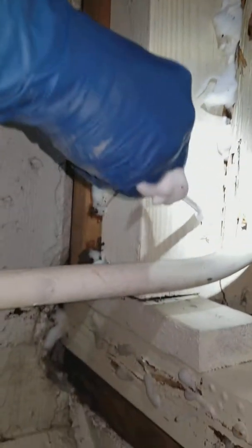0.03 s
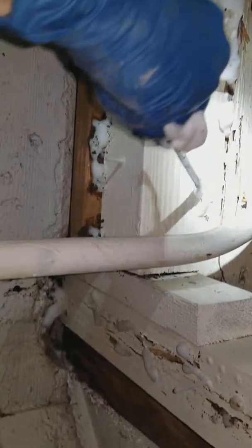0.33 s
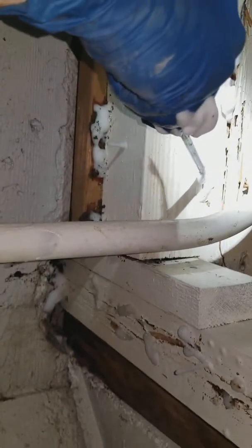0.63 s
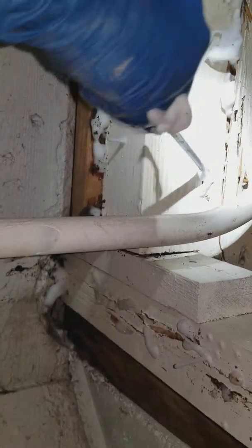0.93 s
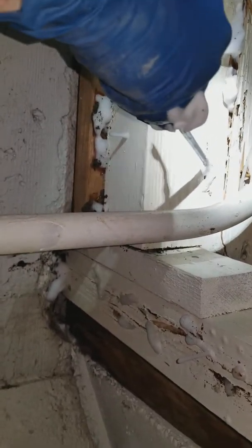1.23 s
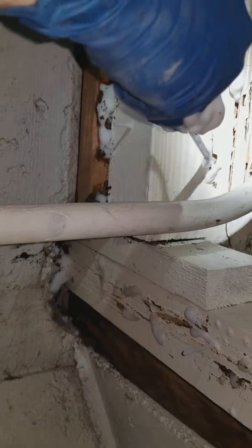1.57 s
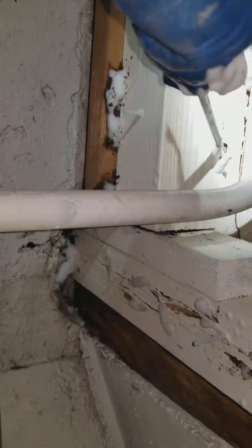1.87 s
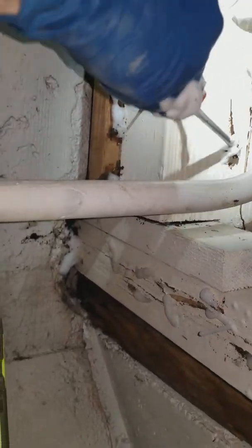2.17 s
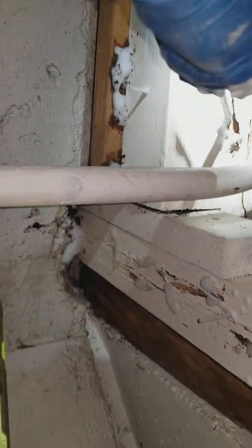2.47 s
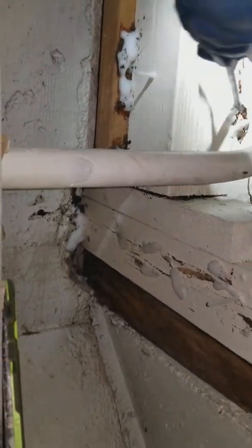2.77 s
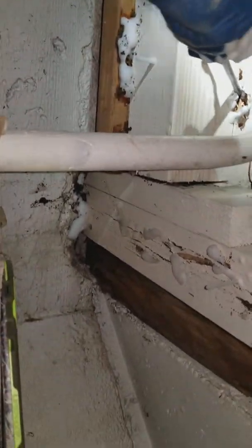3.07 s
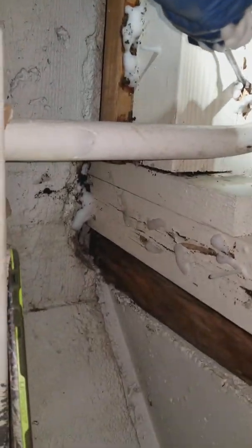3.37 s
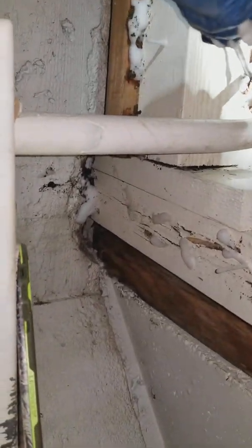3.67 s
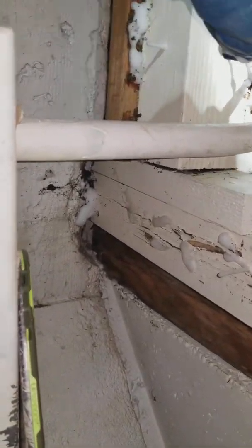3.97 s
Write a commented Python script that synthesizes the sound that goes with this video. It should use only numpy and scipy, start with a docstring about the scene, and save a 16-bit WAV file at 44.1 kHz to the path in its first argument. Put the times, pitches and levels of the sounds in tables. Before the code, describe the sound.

Close by in a tight crawlspace, a wooden beam cracks under a metal pry tool. The blade scrapes softly, then two sharp, splintering crunches with a low boom break out, followed by scraping and ticking chips.

```python
"""A steel pry tool levers a rotten wooden beam open twice in a cramped crawlspace.
Each pry is a swelling crunch of tearing fibres with sharp splinter cracks; the beam booms,
then loose chips tick down. Around the pries the blade scrapes, squeaks and knocks, and an arm
bumps the timber; a few dry clacks sound in between.
The close walls answer briefly over a faint low rumble."""
import sys
import numpy as np
from scipy import signal
from scipy.fft import rfft, irfft, next_fast_len
from scipy.io import wavfile

SR = 44100
rng = np.random.default_rng(int(sys.argv[2]) if len(sys.argv) > 2 else 0)


def file_out(sig):
    """Save sig as 16-bit WAV at sys.argv[1]."""
    # one column per channel
    cols = np.atleast_2d(sig).T
    # limit, then scale
    lim = np.clip(cols, -1, 1)
    pcm = np.round(lim * 32767).astype(np.int16)
    wavfile.write(sys.argv[1], SR, pcm)


N = 176400

# timber resonances: f/Hz, level/dB
WOOD_SPECTRUM = [(40, -21), (110, -2), (165, -1), (215, -9), (270, 3), (360, 1), (430, -4), (510, -5.5),
                 (660, -3), (880, 0), (1200, -2), (1480, 4.5), (1920, 2.5), (2400, -13.5), (3000, -1.5),
                 (3650, -4), (4600, -10), (6000, -11.5), (7800, -21.5), (9300, -41), (11500, -36),
                 (16000, -33.5)]
# boom of the loaded beam: f/Hz, level/dB
BOOM_SPECTRUM = [(40, -27.5), (110, 2), (250, 1), (400, -0.5), (750, -3.5), (1300, -38), (16000, -100)]
# hollow ring of the beam: f/Hz, level/dB, t60/s
BEAM_MODES = [(169, -7, 0.15), (276, -0.5, 0.2), (349.8, -3, 0.29), (421, -2, 0.12), (522, -7.5, .09),
              (820, -8.5, .08)]


def amp(db):
    """Decibels to gain."""
    return 10 ** (np.asarray(db) / 20)


def unit(x):
    """Scale to rms 1."""
    return x / np.sqrt(np.mean(x ** 2) + 1e-30)


def along(points, hz):
    """Interpolate (f/Hz, value) points on a log axis."""
    f, v = np.transpose(points)
    return np.interp(np.log(hz + 1), np.log(f + 1), v)


def filtered(x, response):
    """Apply a complex frequency response."""
    n = x.shape[-1]
    m = next_fast_len(n + 8192)
    return irfft(rfft(x, m) * response(np.fft.rfftfreq(m, 1 / SR)), m)[..., :n]


def kernel(*spectra, size=2048):
    """Minimum-phase impulse response of spectra in series."""
    hz = np.fft.rfftfreq(size, 1 / SR)
    cepstrum = irfft(np.log(amp(sum(along(points, hz) for points in spectra))))
    cepstrum[1:size // 2] *= 2
    cepstrum[size // 2 + 1:] = 0
    return irfft(np.exp(rfft(cepstrum)))


def colour(x, response):
    """Convolve, then scale to rms 1."""
    return unit(signal.fftconvolve(x, response)[:len(x)])


def add(track, start_s, x):
    """Mix x in from start_s."""
    i = max(0, round(start_s * SR))
    n = max(0, min(x.shape[-1], N - i))
    track[..., i:i + n] += x[..., :n]


def mode(t, hz, t60_s):
    """Decaying sine."""
    return 1000 ** (-t / t60_s) * np.sin(2 * np.pi * hz * t)


def grains(n, per_s, spread_db=3.5):
    """Tiny fractures at random times, a few much stronger."""
    size = amp(spread_db * np.minimum(rng.exponential(size=n), 4))
    return size * rng.choice([-1, 1], n) * (rng.random(n) < per_s / SR)


def stroke(length_s, rise_s=0.0073, fall_tau_s=0.015):
    """Force envelope: rise, hold, fade."""
    t = np.arange(SR // 3) / SR
    return np.minimum(t / rise_s, 1) * np.exp(-np.maximum(t - length_s, 0) / fall_tau_s)


def diffuse(n):
    """Stereo noise, alike in the bass, unrelated near 1.2 kHz, closer again above."""
    # f/Hz, left-right correlation
    correlation = [(50, 1), (250, 0.75), (600, .5), (1200, 0), (16000, 0.9)]

    def mid_side_gains(hz):
        angle = np.arccos(np.clip(along(correlation, hz), -1, 1)) / 2
        return np.array([np.cos(angle), np.sin(angle)])

    mid, side = filtered(rng.standard_normal((2, n)), mid_side_gains)
    return np.array([mid + side, mid - side])


def rumble(rms_db=-61):
    """Faint low noise of the still air."""
    # f/Hz, level/dB
    spectrum = [(12, -37.5), (20, -9.5), (96, 0.5), (240, -21), (499, -30), (678, -35), (1760, -32.5),
                (1910, -32.5), (2600, -38), (16000, -42.5)]
    return amp(rms_db) * unit(filtered(diffuse(N), lambda hz: amp(along(spectrum, hz))))


def crawlspace(wall_db=0.5, wall_t60_s=0.023):
    """One stereo path: direct sound, reflections off the nearest timber, short tail."""
    # tail decay: f/Hz, t60/s
    decay = [(100, 0.15), (300, 0.34), (800, 0.35), (1400, 0.29), (1950, 0.38), (2600, 0.33), (5000, 0.21),
             (13000, 0.24)]
    # tail spectrum: f/Hz, level/dB
    spectrum = [(100, -3.5), (400, -4), (1500, -5.5), (4000, -8.5), (8000, -5.5), (14000, -8)]
    # direct sound, left ahead of right: f/Hz, lead/s
    lead = [(300, 0.000032), (1400, 0.00018), (2400, 0.00046), (16000, .00047)]
    n = int(0.4 * SR)
    t = np.arange(n) / SR
    hz, frame_s, noise = signal.stft(diffuse(n), SR, nperseg=256)
    t60_s = along(decay, hz)[:, None]
    energy_norm = np.sqrt(2 * np.log(1000) / (t60_s * SR))
    gain = amp(along(spectrum, hz)[:, None] - 60 * frame_s / t60_s) * energy_norm
    tail = signal.istft(noise * gain, SR, nperseg=256)[1][:, :n] * (1 - np.exp(-t / 0.0011))
    walls = diffuse(n) * amp(-60 * t / wall_t60_s) * (1 - np.exp(-t / 0.001))
    right_only = np.array([[0], [1]])
    direct = filtered(1. * (t == 0), lambda f: np.exp(-2j * np.pi * f * along(lead, f) * right_only))
    return direct + tail + amp(wall_db) * unit(walls) / np.sqrt(n)


def heard(x, paths):
    """Send x down a random path: each sound starts at a slightly different spot."""
    return signal.fftconvolve(x[None], paths[rng.integers(len(paths))], axes=1)


def bumping():
    """An arm thuds softly against the timber; mono."""
    # t/s, length/s, level/dB
    bumps = [(0, 0.11, -44.5), (0.453, 0.062, -41), (0.515, 0.094, -46), (1.26, 0.029, -50),
             (2.019, 0.064, -31.5), (2.259, 0.1, -42.5), (3.069, 0.05, -45)]
    # f/Hz, level/dB
    spectrum = [(25, -44), (58, -16), (75, 6.5), (92, -6), (114, 8.5), (135, -15.5), (165, -3.5),
                (230, -18), (500, -44), (2000, -71.5)]
    out = np.zeros(N)
    for start_s, length_s, db in bumps:
        force = stroke(length_s)
        thud = filtered(rng.standard_normal(len(force)), lambda hz: amp(along(spectrum, hz)))
        add(out, start_s, amp(db) * force * unit(thud))
    return out


def clacking(paths, t60_s=0.06):
    """Three short, dry midrange clacks."""
    # t/s, level/dB
    clacks = [(1.061, -39.5), (1.832, -41.5), (2.233, -39.5)]
    # f/Hz, level/dB
    spectrum = [(300, -49), (900, -13), (1250, 4), (1800, 6), (2400, -9.5), (3000, -7.5), (4200, -25),
                (6000, -38), (16000, -54.5)]
    out, t = np.zeros((2, N)), np.arange(SR // 8) / SR
    for start_s, db in clacks:
        rattle = colour(rng.standard_normal(len(t)), kernel(spectrum))
        add(out, start_s, heard(amp(db) * 1000 ** (-t / t60_s) * rattle, paths))
    return out


def knocking(falloff_db_per_octave=19.5, damping_t60_s=0.12):
    """Blunt knocks ring the beam's modes near one pitch; the resting tool damps them."""
    # t/s, centre f/Hz, level/dB
    knocks = [(1.508, 170, -46), (2.354, 166, -37), (2.403, 174.4, -27), (3.492, 209, -29.5),
              (3.513, 208, -28.5), (3.672, 276, -37)]
    out, t = np.zeros(N), np.arange(SR // 5) / SR
    envelope = 1000 ** (-t / damping_t60_s) * (1 - np.exp(-t / 0.00071))
    for start_s, centre_hz, knock_db in knocks:
        ring = sum(amp(db - falloff_db_per_octave * abs(np.log2(hz / centre_hz))) * mode(t, hz, t60_s)
                   for hz, db, t60_s in BEAM_MODES)
        add(out, start_s, amp(knock_db) * ring / np.abs(ring).max() * envelope)
    return out


def scraping(paths, slips_per_s=6000):
    """The blade rasps over the grain and shakes the beam."""
    # t/s, length/s, rasp/dB, boom/dB
    scrapes = [(0, 0.063, -46.5, -53), (0.103, 0.058, -63.5, -76), (0.318, 0.096, -60, -71),
               (0.353, 0.034, -52.5, -88), (0.433, 0.039, -53.5, -63.5), (0.549, 0.045, -56.5, -60),
               (0.796, 0.065, -52.5, -54.5), (.94, 0.17, -62, -65.5), (1.48, 0.022, -51.5, -57.5),
               (1.494, 0.031, -44, -41), (1.574, 0.068, -57.5, -59), (2.117, 0.11, -52.5, -47.5),
               (2.3, 0.044, -47.5, -53), (2.348, 0.035, -47, -40.5), (2.39, 0.023, -41.5, -35),
               (3.036, 0.13, -60, -68), (3.292, 0.05, -42, -43), (3.471, 0.042, -49.5, -44),
               (3.714, 0.23, -66, -64.5), (3.933, 0.07, -50, -67)]
    # f/Hz, level/dB
    rasp_spectrum = [(200, -19), (550, -20), (900, -1.5), (1500, -2), (2500, 1.5), (3600, 0), (5200, -1.5),
                     (7500, -0.5), (9500, 2), (16000, 5)]
    out = np.zeros((2, N))
    for start_s, length_s, rasp_db, boom_db in scrapes:
        force = stroke(length_s)
        shift = np.exp(rng.normal(0, 0.035))  # resonances vary from spot to spot
        wood = [(hz * shift, db) for hz, db in WOOD_SPECTRUM]
        slips = grains(len(force), slips_per_s)
        rasp = amp(rasp_db) * colour(slips, kernel(rasp_spectrum, wood))
        boom = amp(boom_db) * colour(slips, kernel(BOOM_SPECTRUM, wood))
        add(out, start_s, heard(force * (rasp + boom), paths))
    return out


def squeaking(paths, relative_width=0.018):
    """Steel squeaks on wood: narrow-band noise."""
    # t/s, length/s, f/Hz, level/dB
    squeaks = [(0.558, 0.037, 3420, -65.5), (1.494, 0.0078, 5150, -48), (1.573, 0.045, 3590, -61)]
    out = np.zeros((2, N))
    for start_s, length_s, pitch_hz, db in squeaks:
        force = stroke(length_s)
        noise = rng.standard_normal(len(force))
        whine = filtered(noise, lambda hz: 1 / (1 + ((hz / pitch_hz - 1) / relative_width) ** 2))
        add(out, start_s, heard(amp(db) * force * unit(whine), paths))
    return out


def hits(rows, band_decay, paths, grit, click_db, twang_db):
    """Each hit: a click, a twang at its own pitch, a splintering burst and the beam's ring."""
    # low, mid, high, top band: lower f/Hz, upper f/Hz
    band_edges = [(140, 550), (550, 2500), (2500, 8000), (8000, 16000)]
    twang_t60_s, twang_rise_s = 0.016, 0.0007
    ring_db, ring_scatter_db, ring_rise_s = -4, 2.5, 0.0046
    level_span_s = 0.018  # a burst's level is its energy spread over this span
    out, t = np.zeros((2, N)), np.arange(SR // 6) / SR
    wood = kernel(WOOD_SPECTRUM)
    bands = [signal.sosfilt(signal.butter(3, edges, 'band', fs=SR, output='sos'), wood)
             for edges in band_edges]
    for start_s, hit_db, pitch_hz, *bands_db in rows:
        hit = amp(hit_db + twang_db) * mode(t, pitch_hz, twang_t60_s) * (1 - np.exp(-t / twang_rise_s))
        for band, band_db, (trim_db, t60_s) in zip(bands, bands_db, band_decay):
            burst = (t == 0) + grit * rng.standard_normal(len(t)) * 1000 ** (-t / t60_s)
            hit += amp(band_db + trim_db) * colour(burst, band) * np.sqrt(level_span_s / t[-1])
        click = amp(hit_db + click_db) * wood / np.abs(wood).max()
        add(hit, 0, click)
        add(out, start_s, heard(hit, paths))
        ring = sum(amp(db + rng.normal(0, ring_scatter_db)) * mode(t, hz, t60_s)
                   for hz, db, t60_s in BEAM_MODES)
        add(out, start_s, amp(bands_db[0] + ring_db) * ring * (1 - np.exp(-t / ring_rise_s)))
    return out


def tapping(paths):
    """Chips land and the tool touches lightly."""
    # t/s, level/dB, f/Hz, low/dB, mid/dB, high/dB, top/dB
    taps = [(0.058, -38.5, 807, -50, -52, -64, -80), (0.133, -42, 1510, -55, -69, -66, -72),
            (0.861, -41, 3400, -55.5, -56.5, -56, -68), (0.881, -43.5, 2930, -63, -53, -53, -61),
            (0.942, -45, 1430, -61, -61, -48, -59.5), (2.3, -35, 5170, -52, -50, -46.5, -55.5),
            (3.093, -39, 1210, -61, -45.5, -51, -72), (3.159, -42.5, 1700, -65.5, -63, -53.5, -75),
            (3.491, -30.5, 890, -39.5, -47.5, -54, -62.5), (3.579, -31.5, 1220, -52, -44.5, -51, -85.5),
            (3.672, -35.5, 1950, -37.5, -44, -73.5, -87.5), (3.741, -55, 905, -47.5, -44, -43, -63),
            (3.798, -42, 3720, -59, -52, -50, -61.5), (3.833, -25, 944, -64, -32, -41.5, -60.5),
            (3.881, -44, 8100, -63, -48.5, -44, -51.5), (3.944, -36, 2070, -40.5, -23.5, -26, -39),
            (3.99, -15.5, 1970, -64, -37, -39.5, -66)]
    # per band: trim/dB, t60/s
    band_decay = [(-2.5, 0.14), (-1, 0.025), (-4.5, 0.017), (-2, 0.027)]
    return hits(taps, band_decay, paths, grit=0.075, click_db=-12, twang_db=3.5)


def cracking(paths):
    """Splinters snap under the lever."""
    # t/s, level/dB, f/Hz, low/dB, mid/dB, high/dB, top/dB
    cracks = [(1.905, -36, 3470, -60.5, -47, -42.5, -43.5), (1.919, -19.5, 1820, -50, -37.5, -34.5, -43.5),
              (1.968, -32.5, 8600, -58.5, -54.5, -41, -36.5), (1.9735, -31, 3820, -43.5, -36, -30, -34.5),
              (1.99, -12, 3590, -24.5, -23, -24, -29), (2.0245, -15, 3400, -22, -24, -20.5, -24),
              (2.0395, 4.5, 1510, -15.5, -21.5, -18, -29), (2.0595, -2.5, 3760, -19.5, -20, -19, -41),
              (2.7298, -19, 1806, -32.5, -25.5, -26, -29), (2.7435, -19.5, 3700, -35, -49, -33, -47),
              (2.75, -9.5, 3830, -24.5, -25, -22.5, -46), (2.767, -8, 1530, -30.5, -18.5, -37, -35),
              (2.7735, 1, 1810, -23.5, -24, -37, -46), (2.788, -17, 1520, -27, -20.5, -31, -40),
              (2.8, -17, 1480, -30, -19, -38, -44), (2.8235, -9.5, 1730, -41, -25, -29, -36.5),
              (2.848, -17.5, 1530, -39, -25.5, -50.5, -49.5), (2.8755, -31, 1400, -50, -33.5, -36, -41.5),
              (2.937, -38, 1940, -67, -45, -42.5, -53.5), (3.03, -24, 3380, -51, -45, -38, -50.5),
              (3.286, -16.5, 1745, -49, -33, -34.5, -38)]
    # per band: trim/dB, t60/s
    band_decay = [(-11, 0.13), (-1.5, 0.035), (-4, 0.0025), (-5, 0.0041)]
    return hits(cracks, band_decay, paths, grit=0.11, click_db=-5.5, twang_db=-9)


def prying(paths, fibres_per_s=1300):
    """Fibres tear in dense grains while the beam booms under the lever."""
    # one envelope per pry: t/s, boom/dB, crunch/dB, fizz/dB
    pries = [
        [(1.907, -56, -38, -57.5), (1.96, -47.5, -40, -53), (1.995, -35, -29, -45.5), (2.025, -23, -24.5, -41),
         (2.06, -25.5, -29, -44), (2.088, -36.5, -44, -75), (2.115, -42.5, -58.5, -91)],
        [(2.714, -72, -53, -59.5), (2.733, -36.5, -32.5, -40.5), (2.75, -28, -28, -45),
         (2.775, -29.5, -22.5, -41.5), (2.80, -31.5, -26.5, -43), (2.83, -37, -33.5, -52),
         (2.858, -36.5, -36, -67.5), (2.89, -40.5, -58, -71), (2.93, -72.5, -52, -85.5)],
    ]
    # tearing fibres: f/Hz, level/dB
    crunch = [(250, -44), (600, -12.5), (1500, -11), (2000, 0.5), (3600, -2.5), (7500, -5), (10000, -18.5),
              (16000, -30)]
    # their treble: f/Hz, level/dB
    fizz = [(100, -71.5), (4000, -39.5), (8000, -8), (10000, 5), (16000, 1)]
    out = np.zeros((2, N))
    for rows in pries:
        times_s, *envelopes_db = np.transpose(rows)
        t = np.arange(times_s[0], times_s[-1], 1 / SR)
        fibres = grains(SR // 2, fibres_per_s)[:len(t)]
        tear = sum(amp(np.interp(t, times_s, db)) * colour(fibres, kernel(spectrum, WOOD_SPECTRUM))
                   for db, spectrum in zip(envelopes_db, [BOOM_SPECTRUM, crunch, fizz]))
        add(out, times_s[0], heard(tear, paths))
    return out


def scene():
    """Work on the beam and the clacks, coloured differently left and right, over the rumble."""
    # f/Hz, left over right/dB
    balance = [(60, 6), (200, -1), (380, 0.5), (700, 1), (1300, -2.5), (1950, -7), (2500, 4), (3600, -13.5),
               (4800, -1), (6500, 0.5), (8200, 14.5), (11000, 17), (16000, 6)]
    paths = [crawlspace() for _ in range(16)]
    events = amp(-5) * cracking(paths)
    events += amp(-4.5) * (tapping(paths) + prying(paths))
    events += amp(-7) * (scraping(paths) + squeaking(paths))
    events += clacking(paths) + knocking() + amp(-4.5) * bumping()
    events = filtered(events, lambda hz: amp(along(balance, hz) * np.array([[0.5], [-0.5]])))
    return events + rumble()


def record(dry):
    """Soft-limit the loudest peaks, then low-pass."""
    ceiling, top_hz, taper_hz = 0.85, 16300, 500
    rounded = dry / (1 + np.abs(dry / ceiling) ** 6) ** (1 / 6)
    return filtered(rounded, lambda hz: np.clip((top_hz - hz) / taper_hz, 0, 1))


dry = scene()
out = record(dry)
file_out(out)
```